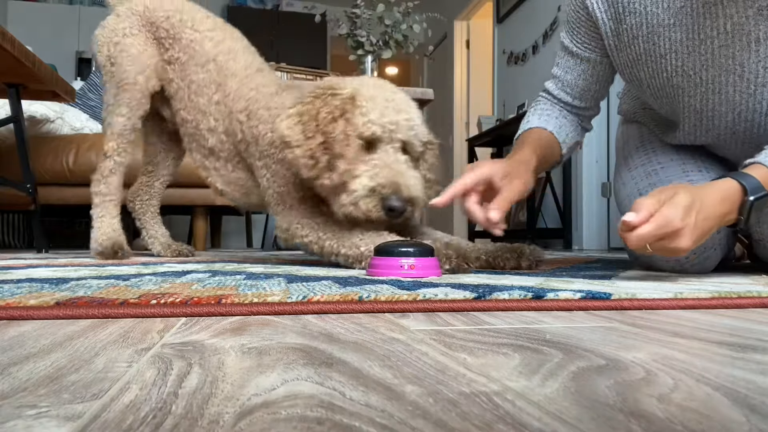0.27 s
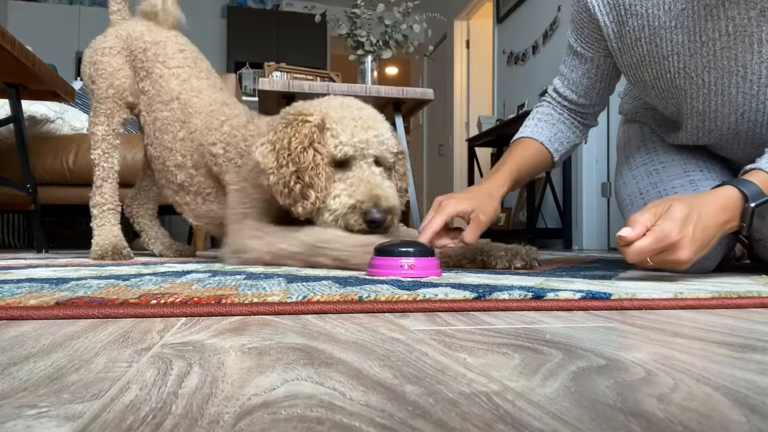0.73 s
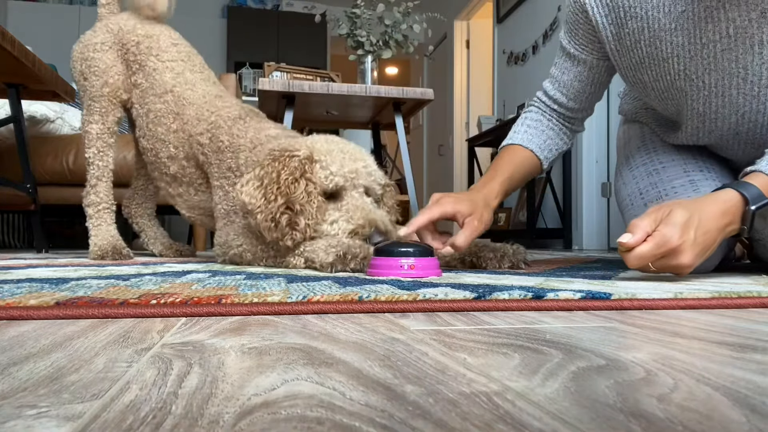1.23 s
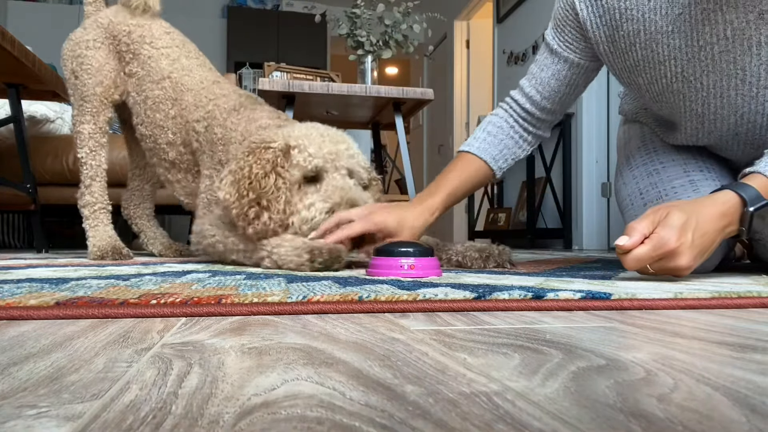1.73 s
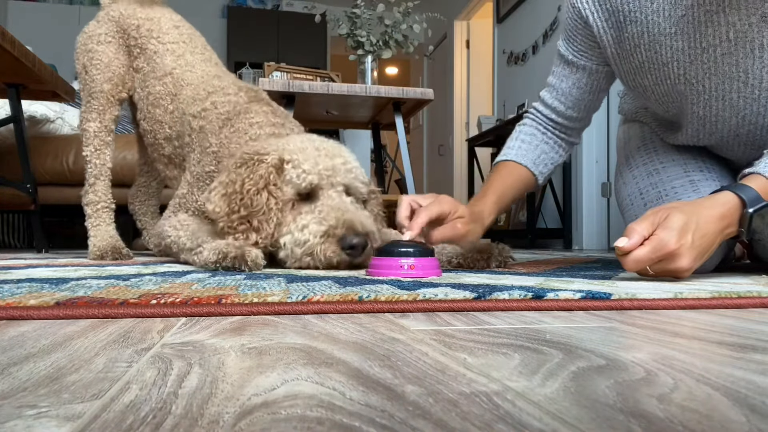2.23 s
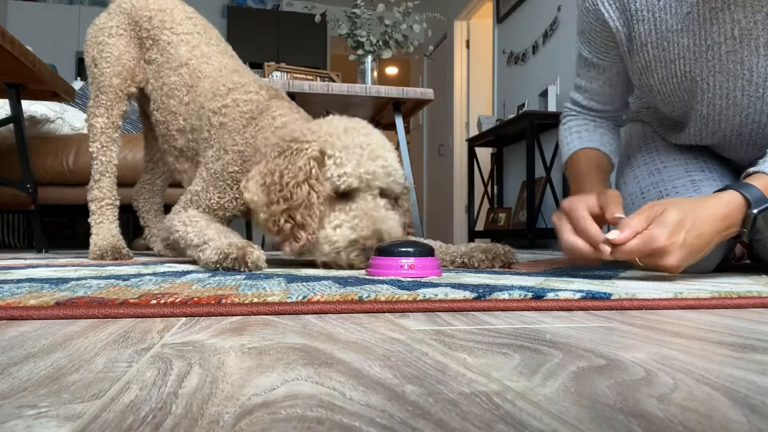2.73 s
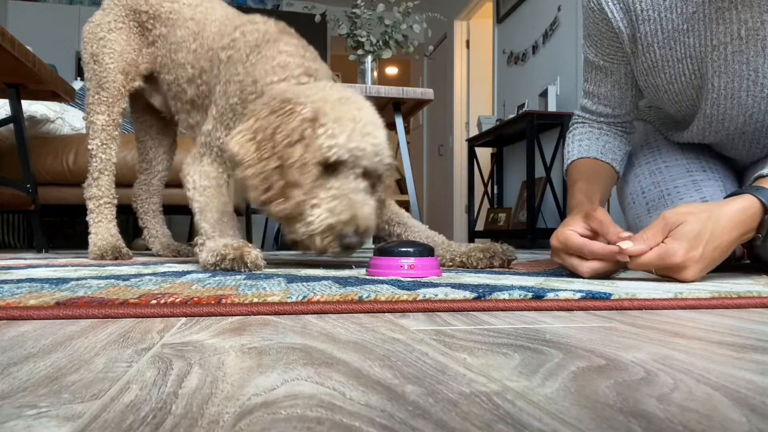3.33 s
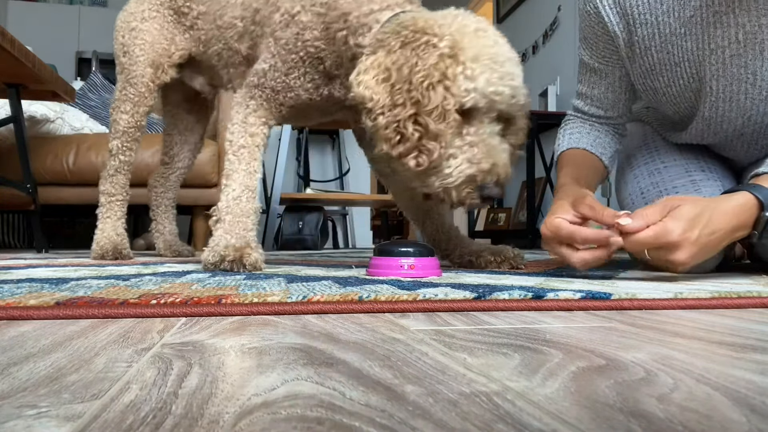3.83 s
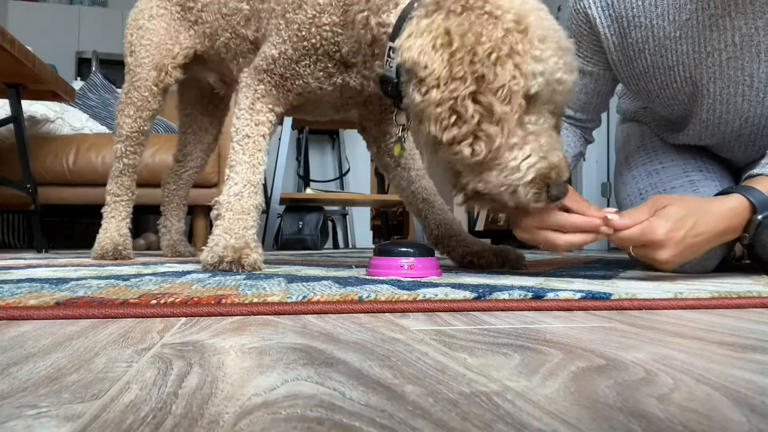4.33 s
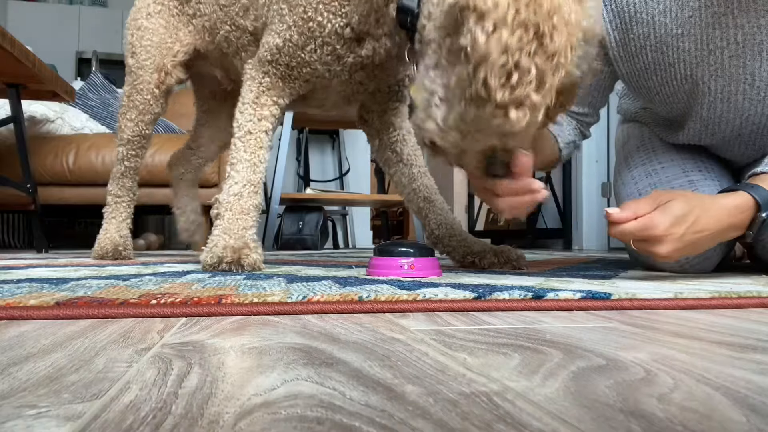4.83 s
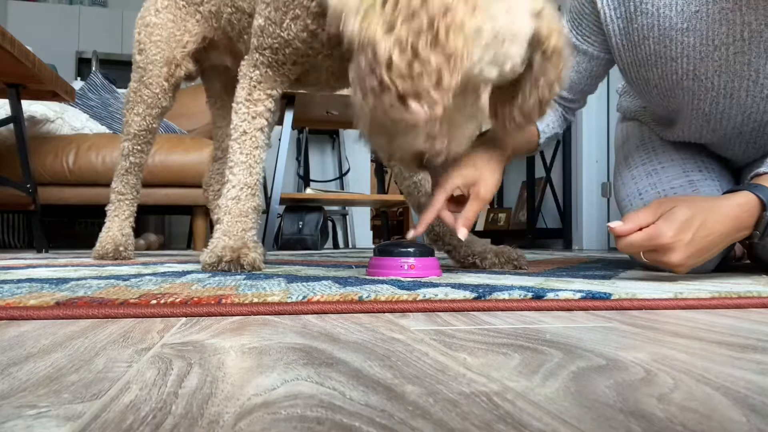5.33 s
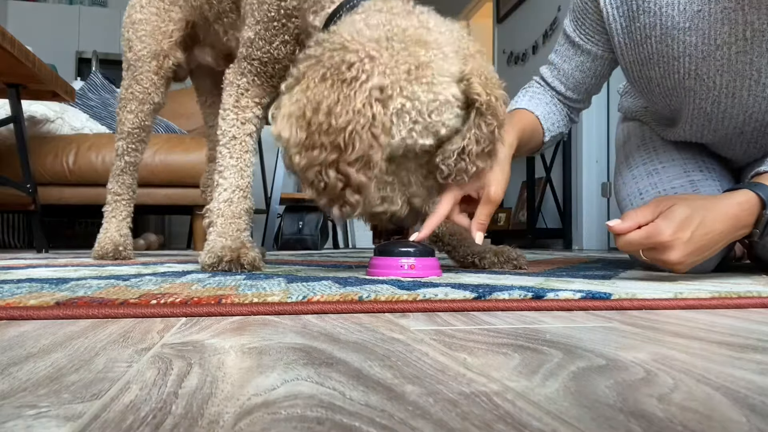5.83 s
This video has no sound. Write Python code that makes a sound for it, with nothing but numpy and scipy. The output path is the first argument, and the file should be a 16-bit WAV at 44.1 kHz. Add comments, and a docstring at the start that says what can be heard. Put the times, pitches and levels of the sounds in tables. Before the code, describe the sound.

A steady low appliance hum fills a quiet living room while a dog rustles on a rug, collar tags tinkling faintly, with one light plastic click.

```python
"""A quiet living room, heard from the floor: an appliance hums, its slow rotor throbbing under a faster motor.
It is made of steady sine tones and noise for moving air, with a faint hiss and thin noise bands around it.
A dog bows on a rug beside a plastic button: paw and hand brush the pile (shaped noise), and its collar tags
tinkle faintly (short damped rings). Twice something hard clicks lightly near the button, as a noise crack and
a brief plastic ring; a near surface and the room answer."""
import sys
import numpy as np
from scipy import signal
from scipy.fft import rfft, irfft, next_fast_len
from scipy.io import wavfile
from scipy.ndimage import uniform_filter1d, map_coordinates

SR = 44100
rng = np.random.default_rng(int(sys.argv[2]) if len(sys.argv) > 2 else 0)


def master_out(mix):
    """Clip the mix to full scale and print it as 16-bit PCM to the path in sys.argv[1]."""
    frames = np.transpose(np.atleast_2d(mix))
    ceiling = np.clip(frames, -1, 1)
    pcm = np.round(ceiling * 32767).astype(np.int16)
    wavfile.write(sys.argv[1], SR, pcm)


N = 268569


def amp(db):
    """Decibels to gain."""
    return 10 ** (np.asarray(db) / 20)


def unit(x):
    """Scale to rms 1."""
    return x / np.sqrt(np.mean(x ** 2) + 1e-20)


def along(points, hz):
    """Read a curve of (frequency, value) points on a log frequency axis."""
    f, v = np.transpose(points)
    return np.interp(np.log(hz + 1), np.log(f + 1), v)


def sides(lean_db):
    """Left and right gains of mean power 1; a positive lean makes the left louder."""
    gains = amp(np.array([lean_db, -lean_db]) / 2).reshape(2, -1)
    return gains / np.sqrt(np.mean(gains ** 2, axis=0))


def wobble(rate):
    """A smooth random curve with rate random points a second."""
    points = rng.standard_normal(int(N * rate / SR) + 4)
    return map_coordinates(points, [np.arange(N) * rate / SR])


def filtered(x, response):
    """Shape the spectrum of x by a response that depends on frequency."""
    m = next_fast_len(N + SR // 2)
    hz = np.fft.rfftfreq(m, 1 / SR)
    return irfft(rfft(x, m) * response(hz), m)[..., :N]


def add(track, s, sound):
    """Mix a short sound in at time s, in seconds."""
    part = track[..., round(s * SR):][..., :sound.shape[-1]]
    part += sound[..., :part.shape[-1]]


# how alike the room's noise is left and right; values are held to -1..1: (frequency [Hz], likeness)
LIKENESS = [(50, 0.5), (100, -0.04), (170, 1.2), (280, 0.7), (450, 0.4), (740, 0.04), (1200, 0.52),
            (2200, 0), (5500, 0), (12000, 0.12)]
# which side the room's noise favours: (frequency [Hz], left over right [dB])
NOISE_LEAN = [(60, 0), (160, 3.5), (400, -1), (700, -0.5), (1200, 1), (6000, 0)]


def diffuse(spectrum):
    """Stereo noise of rms 1 that fills the room; its left-right likeness and balance change with pitch."""
    def mid_and_side_gains(hz):
        turn = np.arccos(np.clip(along(LIKENESS, hz), -1, 1)) / 2
        return amp(along(spectrum, hz)) * np.array([np.cos(turn), np.sin(turn)])

    mid, side = filtered(rng.standard_normal((2, N)), mid_and_side_gains)
    stereo = np.array([mid + side, mid - side])
    return unit(filtered(stereo, lambda hz: sides(along(NOISE_LEAN, hz))))


def tones(lines, drift_s, spread_hz):
    """Steady lines of one machine; standing waves set the two microphones' phases apart as pitch rises."""
    t = np.arange(N) / SR + drift_s * wobble(1.17)  # the timing drifts a little
    out = np.zeros((2, N))
    for hz, db, lean_db in lines:
        apart = rng.choice([-1, 1]) * min((hz / spread_hz) ** 2 + 0.18, 2)  # radians
        phase = rng.uniform(0, 2 * np.pi) + np.array([[apart], [-apart]]) / 2
        out += np.sqrt(2) * amp(db) * sides(lean_db) * np.sin(2 * np.pi * hz * t + phase)
    return out


ROTOR_HZ = 11.39  # turns per second
# harmonics of the slow rotor: (multiple of the turning rate, level [dB], left over right [dB])
ROTOR_HARMONICS = [(4, -73, -0.5), (5, -70, 27), (6, -64.5, 22), (7, -59, 15), (8, -63, 6.5), (9, -60, 6.5),
                   (11, -50.5, -1.5), (13, -59, 7), (14, -63.5, 12.5), (15, -55, 4.5), (16, -63, 1),
                   (17, -53, 3), (18, -57.5, -14.5), (19, -84, -1), (20, -57.5, -3), (21, -71.5, 0),
                   (24, -60.5, 2), (25, -58, -6.5), (26, -71.5, 10), (27, -60.5, -6.5), (29, -63.5, -1),
                   (33, -68, -8), (35, -64.5, -10.5), (39, -71.5, -18)]
# motor and mains tones: (frequency [Hz], level [dB], left over right [dB])
MOTOR_TONES = [(119.2, -69, 0), (187.6, -68, 11), (219.2, -63.5, -7.5), (239, -59, 4.5), (508.5, -66, -3),
               (571.5, -59.5, -5), (598.6, -66.5, -4.5), (628.5, -61.5, 0.5), (749, -77, 0), (1454, -83, 1)]
# spectrum of the moving air: (frequency [Hz], relative level per Hz [dB])
AIR_SPECTRUM = [(20, -17), (36, -12.5), (60, 4), (100, 2), (137, -1.5), (190, 3), (300, -2), (420, -3),
                (600, -6), (740, -11), (1250, -19), (2000, -32), (4000, -62)]


def appliance():
    """Rotor harmonics and motor tones over a rush of air that throbs slightly once a turn."""
    harmonics = [(round(k) * ROTOR_HZ, db, lean_db) for k, db, lean_db in ROTOR_HARMONICS]
    rotor = tones(harmonics, drift_s=0.00031, spread_hz=1100)
    motor = tones(MOTOR_TONES, drift_s=0.00006, spread_hz=428)
    throb_db = 0.17 * np.sin(2 * np.pi * ROTOR_HZ * np.arange(N) / SR)
    wander_db = 0.22 * wobble(2.6)
    air = amp(-48.5 + throb_db + wander_db) * diffuse(AIR_SPECTRUM)
    return rotor + motor + air


def patchy(x, depth_db):
    """Stereo noise with patches of random gain, some 500 Hz wide and 0.1 s long."""
    z = signal.stft(x, nperseg=512)[2]
    field = rng.standard_normal(z.shape[1:])
    field = uniform_filter1d(field, size=6, axis=0)  # smooth over frequency
    field = uniform_filter1d(field, size=18, axis=1)  # smooth over time
    return unit(signal.istft(z * amp(depth_db * unit(field)), nperseg=512)[1][:, :N])


# spectrum of the faint hiss: (frequency [Hz], relative level per Hz [dB])
HISS_SPECTRUM = [(500, -20), (2500, 8), (4000, 2.5), (6000, 2.5), (7800, 9), (9600, -5), (13500, -3),
                 (15500, -20)]
HISS_START_DB, HISS_FADE_DB_PER_S, HISS_PATCHY_DB = -70.0, 0.12, 1.2


def hiss():
    """The room's faint hiss: noise that swells and sinks in patches and slowly fades."""
    level_db = HISS_START_DB - HISS_FADE_DB_PER_S * np.arange(N) / SR
    return amp(level_db) * patchy(diffuse(HISS_SPECTRUM), HISS_PATCHY_DB)


def diffuse_band(centre_hz, width_hz):
    """Stereo noise of rms 1 through one narrow resonance, at half gain width_hz from its centre."""
    noise = rng.standard_normal((2, N))
    return unit(filtered(noise, lambda hz: 1 / (1 + ((hz - centre_hz) / width_hz) ** 2)))


# narrow bands that sing faintly in the background: (centre [Hz], distance to half gain [Hz], level [dB])
WHINE_BANDS = [(994.5, 6, -72), (1305, 28, -80), (1500, 18, -86), (1680, 22, -85.5), (2830, 35, -88.5),
               (3200, 25, -91), (3420, 40, -90), (4480, 25, -90), (7720, 90, -86), (13000, 180, -91)]


def whines():
    """Thin bands of noise over the hiss."""
    return sum(amp(db) * diffuse_band(hz, width_hz) for hz, width_hz, db in WHINE_BANDS)


# spectrum of the rubbed pile: (frequency [Hz], relative level per Hz [dB])
PILE_SPECTRUM = [(300, -26), (900, 4.5), (1900, 2.5), (2400, 0), (2950, 0.5), (3800, -5.5), (4300, -3),
                 (5200, -13), (10000, -34)]
# strokes over the rug: (start [s], fastest [s], end [s], level before tilt [dB], treble tilt [dB per octave])
RUG_STROKES = [(0.65, 0.725, 0.77, -63.5, -2), (0.715, 0.765, 0.805, -62.5, 2.5),
               (0.855, 0.885, 0.96, -76.5, 8.5), (1.605, 1.8, 1.96, -65, 1),
               (1.83, 1.905, 1.958, -63.5, -2.5)]
# soft rustle of fur and clothes, settling as the dog comes to rest; the tilt is per octave
SHUFFLE_DB, SETTLE_DB_PER_S, SHUFFLE_TILT_DB = -68, 2.5, -5


def rug():
    """Paw and hand brush the pile over a settling shuffle; strokes ease in and out, fibres catch unevenly."""
    t = np.arange(N) / SR
    catching = amp(0.5 * wobble(45) + 1.2 * wobble(400))
    fidget_db = 0.8 * wobble(9)
    noise = rng.standard_normal(N)
    near = unit(filtered(noise, lambda hz: amp(along(PILE_SPECTRUM, hz))))  # alike at both microphones
    fibres = catching * unit(diffuse(PILE_SPECTRUM) + amp(-4.5) * near)

    def brush(speed, db, tilt_db):
        """Faster rubbing is louder; the tilt turns about 2 kHz."""
        return filtered(speed * fibres,
                        lambda hz: amp(db + tilt_db * np.log2(np.clip(hz, 500, 5000) / 2000)))

    out = brush(amp(fidget_db - SETTLE_DB_PER_S * t), SHUFFLE_DB, SHUFFLE_TILT_DB)
    for start, fastest, end, db, tilt_db in RUG_STROKES:
        progress = np.interp(t, [start, fastest, end], [0, 1, 0])
        out += brush(np.sin(np.pi / 2 * progress), db, tilt_db)
    return out


# how long the room rings: (frequency [Hz], time to fall 60 dB [s])
ROOM_RING = [(300, 0.4), (2000, 0.22), (5000, 0.37), (9000, 0.49), (15000, 0.2)]
# what the walls send back: (frequency [Hz], relative level [dB])
WALL_RETURN = [(300, 7), (1000, 11.5), (3200, 3), (4400, -0.5), (8000, 3.5), (13000, -5)]


def room(x):
    """The room's tail: noise in which each frequency dies at its own speed."""
    hz, t, z = signal.stft(rng.standard_normal((2, SR // 2)), SR, nperseg=256)
    decay_db = along(WALL_RETURN, hz)[:, None] - 60 * t / along(ROOM_RING, hz)[:, None]
    tail = signal.istft(z * amp(decay_db), SR, nperseg=256)[1]
    tail = tail * (1 - np.exp(-np.arange(tail.shape[1]) / SR / 0.00062))  # soft start
    return signal.fftconvolve(x, tail / np.linalg.norm(tail[0]), axes=1)[:, :N]


def ring(modes, t, scatter_db):
    """Damped modes, each at a new strength and phase."""
    out = np.zeros(len(t))
    for hz, db, t60 in modes:
        strength_db = db + rng.normal(0, scatter_db)
        out += amp(strength_db - 60 * t / t60) * np.sin(2 * np.pi * (hz * t + rng.random()))
    return out


# timed touches of the collar tags, strong and faint, damped by the fur:
# (time [s], relative level [dB], damping [factor], strength of the low modes [dB])
TAG_TOUCHES = [(0.0615, -42, 5.8, 2), (.2578, -52, 2.5, -4), (.4888, -62, 2.5, 0), (0.7766, -56, 1, -3),
               (.8809, -59, 1.8, -3), (1.4835, -65, 2, -3), (1.6282, -57, 0.79, 0), (1.9699, -59, 0.63, -1),
               (2.522, -43, 0.69, 0), (2.5654, -43, 2, 6), (2.582, -63, 1.3, 0), (2.7616, -58, 0.8, 1),
               (2.79, -60, 0.6, -1), (2.9272, -55, 1.6, 0), (2.9465, -55, 1.3, 2), (2.969, -50.5, 0.95, -4),
               (3.0884, -47, 1.1, -1), (3.265, -46.5, 1, 3), (3.3872, -62, 1.5, 0),
               (3.4036, -55.5, 3.5, 12), (3.468, -63, 1.1, 0), (3.508, -56.5, 1.8, 15),
               (3.6172, -62, 1.5, 15), (3.6915, -55, 1.1, -5), (3.8477, -61, 1.6, 3), (4.081, -63, 3, 3),
               (4.529, -58, 1.8, 4), (4.7586, -59, 2, 0), (5.2834, -55, 2.8, 0)]
# a tag falls back once after each timed touch: typical delay and loss
REBOUND_S, REBOUND_LOSS_DB = 0.011, 6
# further touches come by chance, thickest while the dog lifts its head: centre, spread, mean relative level
LIFT_S, LIFT_SPREAD_S, CHANCE_DB = 3.4, 0.35, -56


def tag_contacts(count):
    """List every contact: timed touches, their rebounds and count chance touches, in the touches' columns."""
    rebounds = []
    for s, db, damping, low_db in TAG_TOUCHES:
        delay_s = REBOUND_S * np.exp(0.42 * rng.standard_normal())
        rebounds.append((s + delay_s, db - REBOUND_LOSS_DB, damping, low_db))
    chance_touches = []
    for when, force, fur in rng.standard_normal((count, 3)):
        s = np.clip(LIFT_S + LIFT_SPREAD_S * when, 0, N / SR)
        chance_touches.append((s, CHANCE_DB + 2 * force, np.exp(0.59 * fur), 0))
    return TAG_TOUCHES + rebounds + chance_touches


# the tags' ringing modes: (typical frequency [Hz], typical relative level [dB], undamped time to fall 60 dB [s])
TAG_MODES = [(7550, -15, 0.025), (8960, -12, 0.026), (13020, -3.5, 0.056), (13380, -12, 0.028),
             (14830, -11, 0.055)]


def collar():
    """Small metal tags touch as the dog moves its head: a tick and a thin, high ring, damped by the fur."""
    out, t = np.zeros((1, N)), np.arange(SR // 5) / SR
    for s, db, damping, low_db in tag_contacts(count=3):
        # where the tags meet colours the ring
        modes = [(hz * (1 + rng.normal(0, 0.004)), level + low_db * (hz < 10000), t60 / damping)
                 for hz, level, t60 in TAG_MODES]
        tick = amp(-2 - 60 * t / 0.011) * rng.standard_normal(len(t))
        onset = 1 - np.exp(-t / 0.00044)
        add(out, s, amp(db - 2.5) * (ring(modes, t, scatter_db=4.0) + tick) * onset)
    out = filtered(out, lambda hz: 1 - 1 / (1 + (hz / 7300) ** 6))  # small plates radiate no bass
    return out + amp(3.0) * room(out)


# hard clicks: (time [s], relative level [dB], treble tilt [dB per octave],
# lag of the left microphone [s], room level over click level [dB])
HARD_CLICKS = [(2.2131, -20.5, 1, 0.000093, 5.5), (5.347, -35.5, -2, 0.00009, 7.5)]
# what a click rings with: (frequency [Hz], typical level before tilt [dB], time to fall 60 dB [s])
PLASTIC_MODES = [(707, -13.5, 0.024), (1084, -16, 0.016), (1490, -17, 0.017), (2154, -12.5, 0.017),
                 (2470, -17.5, 0.013), (3250, -21, 0.009), (4370, 2, 0.0056), (5900, 5, 0.0049),
                 (6770, -2.5, 0.009), (7900, -1, 0.0052), (8550, -11, .018), (9500, -5.5, 0.0037),
                 (11850, -4.5, 0.0038), (13200, -2, 0.0046)]
# spectrum of the contact's crack: (frequency [Hz], level before tilt [dB])
CRACK_SPECTRUM = [(500, -3), (1400, -2), (2300, -16), (3500, -5.5), (4250, 6), (5400, 0.5), (6500, -1),
                  (8000, -4), (10300, -16), (13500, 6), (16000, -11)]
# the contact: time constant of its build-up, crack level and the crack's time to fall 60 dB
CONTACT_S, CRACK_DB, CRACK_T60_S = 0.000489, -2, 0.008
# a near surface returns the click: delay, and level relative to the click
ECHO_S, ECHO_DB = 0.0138, -24


def clicks():
    """A hard contact builds up within a millisecond, cracks and rings plastic briefly; the softer is duller."""
    direct, blows, t = np.zeros((2, N)), np.zeros((1, N)), np.arange(SR // 10) / SR
    hz = np.fft.rfftfreq(len(t), 1 / SR)

    def delay(seconds):
        return np.exp(-2j * np.pi * hz * seconds)

    for s, db, tilt_db, lag_s, room_db in HARD_CLICKS:
        def colour_db(f):
            return tilt_db * np.log2(np.maximum(f, 2000) / 4000)

        modes = [(f, level + colour_db(f), t60) for f, level, t60 in PLASTIC_MODES]
        crack_gain = amp(along(CRACK_SPECTRUM, hz) + colour_db(hz))
        contact = amp(db) * (1 - np.exp(-(t / CONTACT_S) ** 2))
        crack = contact * amp(CRACK_DB - 60 * t / CRACK_T60_S) * rng.standard_normal(len(t))
        click = rfft(contact * ring(modes, t, scatter_db=2.2)) + rfft(crack) * crack_gain
        # the sound reaches the right microphone first
        pair = irfft(click * delay(lag_s * np.array([[1], [0]])))
        add(direct, s, pair[:, :len(t) // 2])
        blow = irfft(crack_gain * delay(2 * CONTACT_S))
        add(blows, s, amp(db + room_db) * blow[:len(t) // 2])
    echo = amp(ECHO_DB) * filtered(direct, lambda f: np.exp(-2j * np.pi * f * ECHO_S))
    # the walls blur the crack into a hiss, tinted by the ring
    return direct * sides(2.3) + echo + room(blows + amp(-29) * direct[:1])


def scene():
    """The hum and hiss of the room with the small sounds on the rug."""
    return appliance() + hiss() + whines() + rug() + collar() + clicks()


TOP_HZ = 15300  # upper band limit


def record(dry):
    """The phone keeps next to nothing above its band limit: a very steep low-pass."""
    return filtered(dry, lambda hz: 1 / np.sqrt(1 + (hz / TOP_HZ) ** 100))


dry = scene()
out = record(dry)
master_out(out)
```